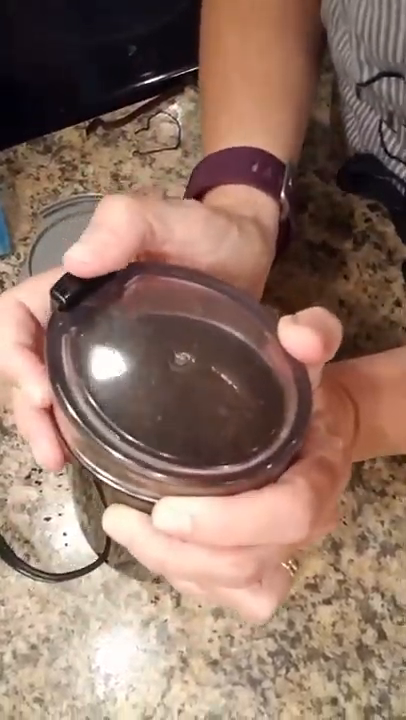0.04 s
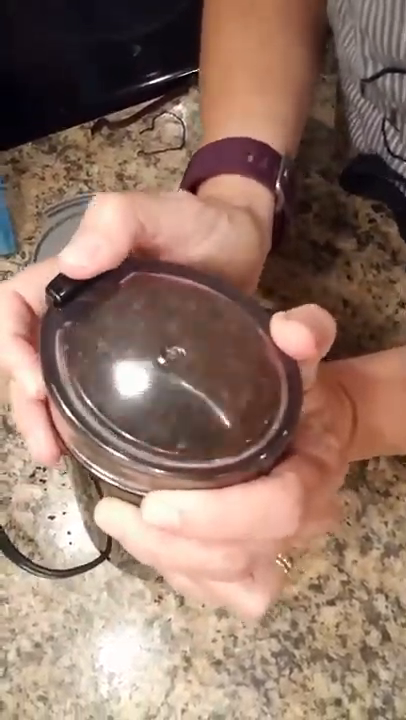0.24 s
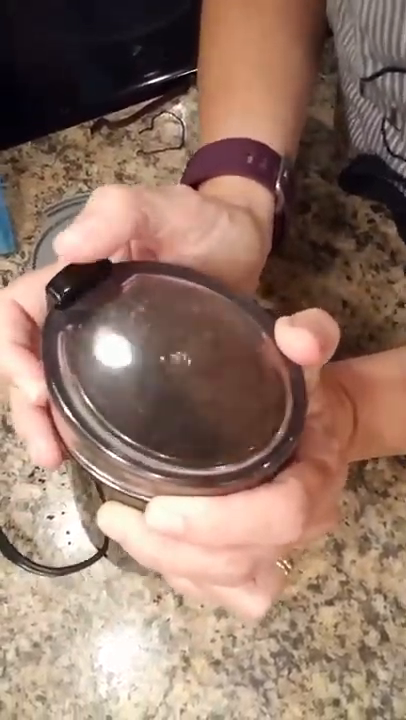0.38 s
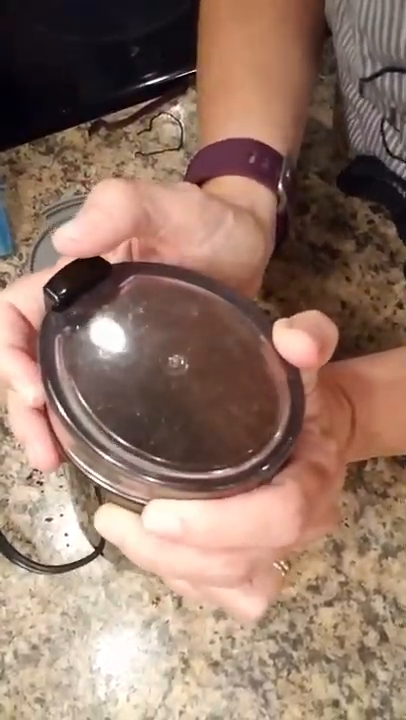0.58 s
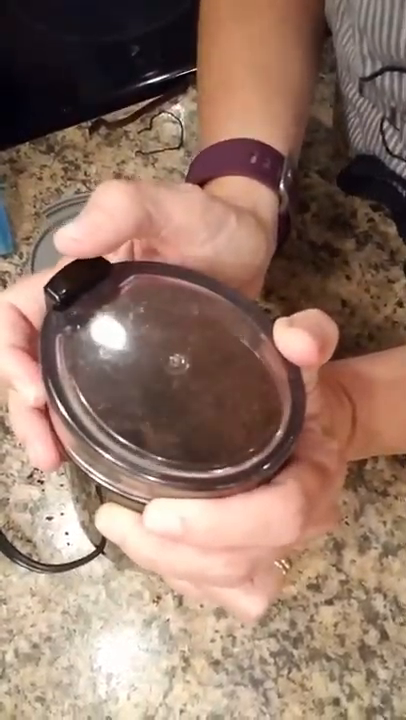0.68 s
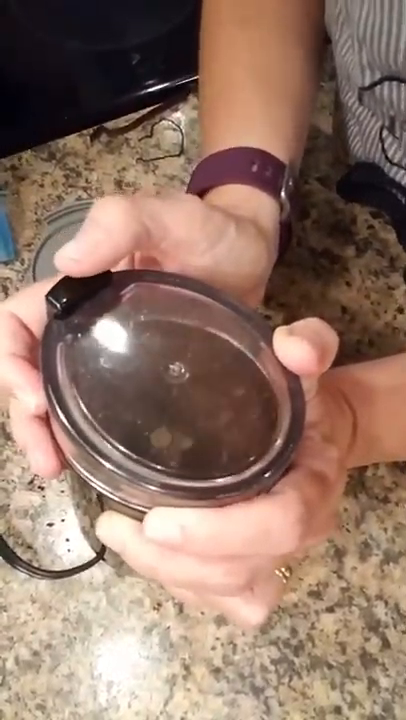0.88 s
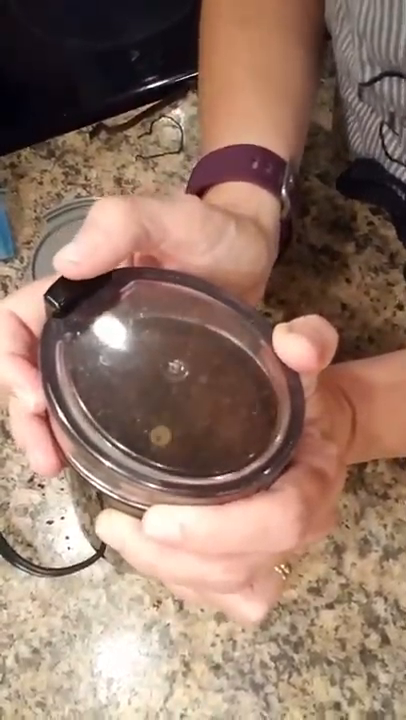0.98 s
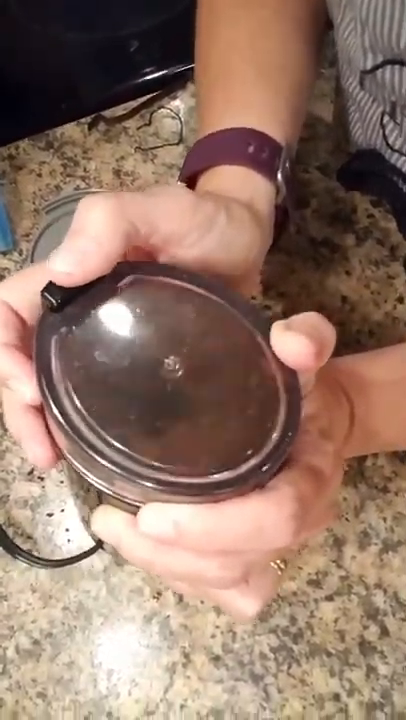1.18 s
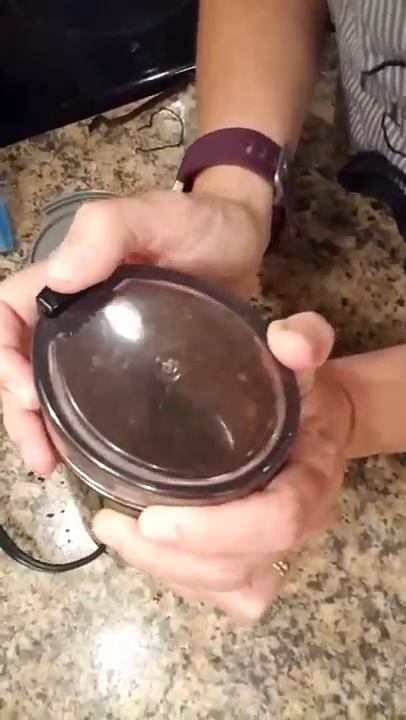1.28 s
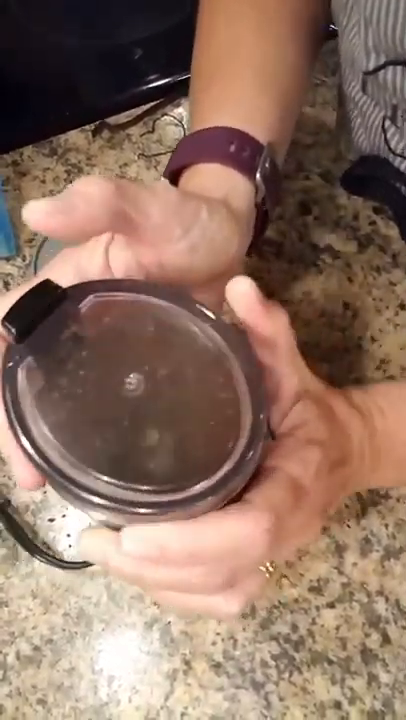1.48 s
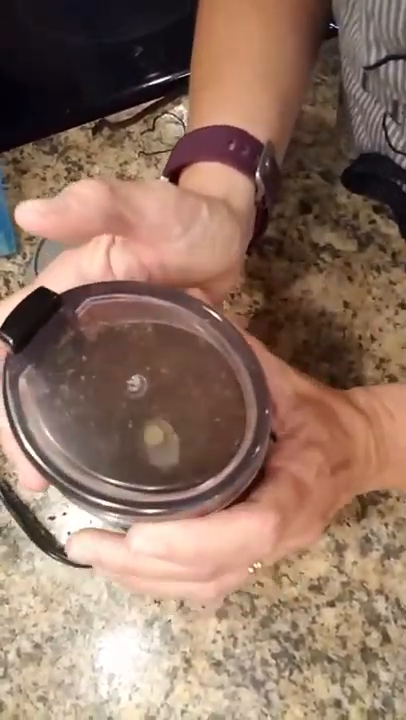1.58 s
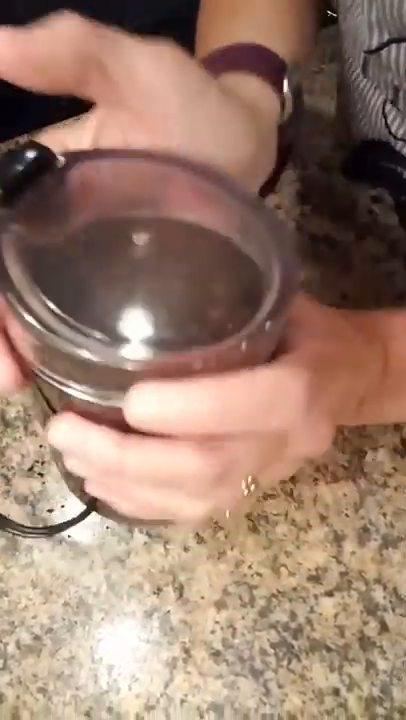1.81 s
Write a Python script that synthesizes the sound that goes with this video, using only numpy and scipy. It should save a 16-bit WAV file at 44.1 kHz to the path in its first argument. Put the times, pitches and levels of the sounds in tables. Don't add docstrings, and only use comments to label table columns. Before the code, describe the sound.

A small electric blade grinder pulses twice, beans rattling and hissing in its cup, then button clicks.

```python
import sys
import numpy as np
from scipy import signal
from scipy.fft import rfft, irfft, next_fast_len
from scipy.io import wavfile
from scipy.ndimage import uniform_filter1d

SR = 44100
rng = np.random.default_rng(int(sys.argv[2]) if len(sys.argv) > 2 else 0)


def invert_db(level):
    return 10 ** (np.asarray(level, dtype=float) / 20)


def transcribe(u):
    v = np.clip(np.atleast_2d(u).T, -1, 1)
    q = np.round(v * 32767).astype(np.int16)
    wavfile.write(sys.argv[1], SR, q)


N = 81585

# start_s [s], level_db [dB]
WHIRL = [
    [(.2425, -75.5), (.245, -21.5), (.29, -20), (.334, -29.5), (.384, -21.5), (.764, -25.5), (.88, -30.5),
     (.98, -55.5), (1.11, -86.5)],
    [(1.265, -85.5), (1.268, -34), (1.3, -20), (1.366, -33.5), (1.373, -25.5), (1.542, -26), (1.655, -41.5),
     (1.72, -62), (1.83, -87.5)],
]
# start_s [s], grit_db [dB], cup_knock_db [dB], low_knock_db [dB]
CLUMPS = [(0.2465, -13, -17.5, -11.5), (0.261, -7, -21.5, -31), (0.2896, -3.5, -27, -22.5),
          (0.3414, -14, -24.5, -52.5), (0.36, -8, -20, -52.5), (0.385, -4, -19.5, -30),
          (0.4114, -5, -34, -46.5), (0.4504, -1, -24, -54), (0.51, -12.5, -24, -31), (0.5671, -7, -21, -40),
          (0.6378, 0, -37.5, -25.5), (0.804, -16.5, -25.5, -24.5), (0.8331, -14, -27.5, -22.5),
          (0.8793, -32, -27, -26), (1.2777, -11, -19.5, -20.5), (1.2956, -14.5, -22.5, -40),
          (1.3424, -3, -57, -34), (1.4057, -6, -41, -46), (1.4324, -3, -22.5, -26.5),
          (1.5054, -6, -33, -34), (1.5554, -5, -28, -29)]
# start_s [s], grit_db [dB], cup_knock_db [dB]
SNAPS = [(0.3913, -8, -14), (0.4155, -4.5, -31), (0.4878, -22, -47), (0.628, -7.5, -8), (0.6972, -3, -13.5),
         (.7035, -10.5, -43), (0.7254, -8.5, -34), (0.7442, -11, -28.5), (0.7645, -12.5, -30),
         (0.8542, -12.5, -35), (1.3728, -7.5, -34), (.2615, -17, -23), (.3395, -13.5, -30.5),
         (.3455, -8.5, -22), (.5675, -12, -28), (.7815, -11.5, -28), (1.3345, -19, -37),
         (1.4062, -14.5, -33), (1.42, -9, -39), (1.4915, -10.5, -36.5), (1.501, -18.5, -38),
         (1.528, -18.5, -37)]
# start_s [s], speed_hz [turns per s], level_db [dB]
ROTOR = [
    [(.25, 325, -33), (.304, 250, -49.5), (.35, 286, -39), (.398, 311, -38.5), (.48, 255, -45),
     (.612, 188, -40), (.702, 130, -40.5), (.73, 240, -60)],
    [(1.33, 180, -48), (1.36, 166, -41.5), (1.42, 144.6, -38.5), (1.45, 100, -54), (1.51, 94.8, -39),
     (1.57, 103, -36.5), (1.625, 124, -43), (1.66, 67, -58.5)],
]


def rms_one(x):
    return x / np.sqrt(np.mean(x ** 2) + 1e-20)


def in_time(rows, off=-120):
    s, *columns = np.transpose(rows)
    return [np.interp(np.arange(N) / SR, s, c, off, off) for c in columns]


def at_hz(points, hz):
    point_hz, value = np.transpose(points)
    return np.interp(np.log(hz), np.log(point_hz), value)


def drift(rate):
    r = np.exp(-2 * np.pi * rate / SR)
    wander = signal.lfilter([1], [1, -2 * r, r * r], rng.standard_normal(N + SR))
    return rms_one(wander[SR:])


def resonate(x, table):
    out = 0
    for k, (hz, width_hz, db) in enumerate(table):
        r = np.exp(-np.pi * width_hz / SR)
        poles = [1, -2 * r * np.cos(2 * np.pi * hz / SR), r * r]
        ring = signal.lfilter([1, 0, -1], poles, x + 1e-18) * (1 - r * r) / 2
        out = out + (-1) ** k * invert_db(db) * ring
    return out


def colour(x, spectrum):
    hz = np.maximum(np.fft.rfftfreq(x.shape[-1], 1 / SR), 1)
    return irfft(rfft(x) * invert_db(at_hz(spectrum, hz)), x.shape[-1])


def glide(rows, wobble_db, wobble_hz):
    hz, db = in_time(rows)
    gain = uniform_filter1d(invert_db(db + wobble_db * drift(22)), size=400)
    pitch_hz = np.maximum(hz, 60) + wobble_hz * drift(30)
    return np.sqrt(2) * gain * np.sin(2 * np.pi * np.cumsum(pitch_hz) / SR)


def background():
    # pitch_hz [Hz], level_db [dB per Hz]
    hush_spectrum = [(15, -25.5), (25, -1.5), (427, -18.5), (1260, -30.5), (1480, -30.5), (1650, -40.5),
                     (1790, -28), (3430, -42), (16000, -51)]
    t = np.arange(N) / SR
    hush = invert_db(-60) * rms_one(colour(rng.standard_normal((2, N)), hush_spectrum))
    hush[0] += invert_db(-59) * np.sin(2 * np.pi * 59 * t)
    gain_before_db, gain_drop_s = 5.5, .25
    return hush * invert_db(gain_before_db * (t < gain_drop_s))


def housing():
    # start_s [s], level_db [dB]
    shake_rows = [
        [(0, -59), (.24, -49.5), (.26, -28), (.43, -48.5), (.65, -42.5), (.9, -45.5), (1.06, -69)],
        [(1.265, -46), (1.28, -32), (1.45, -50), (1.58, -31), (1.66, -44), (1.82, -68.5)],
    ]
    # pitch_hz [Hz], width_hz [Hz], level_db [dB]
    body_modes = [(92, 24, 1.5), (135, 31, -1), (182, 33, -6.5)]
    shake = sum(invert_db(in_time(rows)[0]) for rows in shake_rows)
    rumble = resonate(rng.standard_normal((2, N)), body_modes)
    return shake * rms_one(resonate(rumble, [(131, 290, 0)]))


def knocks():
    # crest_s [s], peak_db
    # [dB], pitch_hz [Hz]
    hit_rows = [(.249, -32, 1300), (.265, -14, 2115), (.271, -23, 1900), (.297, -19, 3450),
                (.342, -19, 2045), (.349, -24, 1950), (.393, -14, 3900), (.4, -16.5, 1870),
                (.452, -12, 3200), (.459, -12, 4000), (.509, -25, 1980), (.552, -25, 2330),
                (.581, -17.5, 3240), (.593, -33, 850), (.594, -24, 2010), (.639, -13.5, 3850),
                (.672, -19, 2270), (.7, -11, 3320), (.757, -21, 3200), (.791, -24, 3720),
                (.796, -22.5, 2160), (.806, -20.5, 2010), (.807, -27.5, 656), (.834, -36, 780),
                (.884, -23, 2040), (.899, -25.5, 3700), (1.279, -21.5, 3400), (1.28, -29.5, 1184),
                (1.281, -27, 2000), (1.298, -16, 3570), (1.302, -12.5, 1964), (1.343, -37, 3380),
                (1.399, -32, 2060), (1.406, -29, 3300), (1.432, -28, 2270), (1.434, -29, 842),
                (1.441, -19.5, 1980), (1.492, -25, 1970), (1.508, -34, 2100), (1.528, -27, 3800),
                (1.531, -24.5, 876), (1.556, -14, 4090), (1.559, -18.5, 1875), (1.583, -26.5, 2060),
                (0.256, -23.5, 1510), (1.284, -31, 395), (0.055, -50.5, 1790), (.1118, -39.5, 4000),
                (.192, -56, 1800)]
    swell_cycles, trim_db = 4.49, -3
    out = np.zeros((2, N))
    turns = rng.uniform(0, 2 * np.pi, (len(hit_rows), 2))
    for (s, db, hz), turn in zip(hit_rows, turns):
        t = np.maximum((np.arange(N) / SR - s) * hz / swell_cycles + 1, 0)
        ring = np.sin(2 * np.pi * swell_cycles * t + turn[:, None])
        out += invert_db(db + trim_db) * t * np.exp(1 - t) * ring
    return out


def button():
    # start_s [s], peak_db [dB], pitch_hz [Hz], brightness_db [dB]
    tick_rows = [
        (0.13, -43.5, 3950, 4),
        (1.248, -74, 1800, 3),
        (1.8435, -45.5, 1900, -11),
        (0.23, -68, 6000, 5.5),
        (1.836, -44.5, 2050, -6.5),
    ]
    rattle_s = .004
    out, noise = 0, rng.standard_normal((2, N))
    for s, db, hz, bright_db in tick_rows:
        t = np.arange(N) / SR - s
        burst = noise * invert_db(db) * np.exp(-np.maximum(t, 0) / rattle_s) * (t >= 0)
        out = out + 5 * resonate(burst, [(hz, 500, 0)])
        out = out + 5 * resonate(burst, [(hz / 1.9, 400, bright_db - 3)])
        out = out + invert_db(bright_db - 7) * burst
    return out


def grains(rate, spread_db, lumpy_db):
    size = invert_db(spread_db * np.minimum(rng.exponential(1, N), 4) + lumpy_db * drift(86))
    strikes = rng.random(N) < rate / SR
    return rms_one(size * strikes * rng.standard_normal((2, N)))


def bursts(rows, column, trim_db, rise_s, fall_s):
    rows = np.array(rows)
    t = np.arange(N) / SR - rows[:, :1]
    shape = np.exp(np.where(t < 0, t / rise_s, -t / fall_s))
    level = invert_db(rows[:, column:column + 1] + trim_db)
    return ((level * shape) ** 2).sum(axis=0)


def clumps(column, trim_db, fall_s):
    return bursts(CLUMPS, column, trim_db, .0021, fall_s)


def snaps(column, trim_db):
    return bursts(SNAPS, column, trim_db, .0003, .0028)


def steady(follows, level_db):
    whirl = sum(invert_db(in_time(rows)[0] + 26) for rows in WHIRL)
    return (whirl ** follows * invert_db(level_db - 24)) ** 2


def strike(hits, power, body):
    return body(hits * np.sqrt(power)) / np.sqrt(np.mean(body(hits) ** 2))


def grit():
    # pitch_hz [Hz], level_db [dB per Hz]
    hiss_spectrum = [(200, -34.5), (1500, -25.5), (1940, -13), (4000, -9.5), (7270, -9), (11300, -2),
                     (16000, -3.5)]
    power = steady(1.05, 3) + clumps(1, -11, .0048) + snaps(1, .5)
    return strike(grains(16000, .94, .98), power, lambda x: colour(x, hiss_spectrum))


def cup(x):
    # pitch_hz [Hz], width_hz [Hz], level_db [dB]
    wall_modes = [(1844, 140, 3), (2100, 283, -0.5), (2428, 154, 2.5), (2923, 71, 1), (3212, 243, -0.5),
                  (3976, 710, -1), (5040, 510, -3), (5800, 1100, -8.5)]
    speed = uniform_filter1d(np.maximum(in_time(ROTOR[0])[0], 0), size=2000)
    bright_db_per_octave = 1.5
    tilt = invert_db(bright_db_per_octave * np.log2(np.maximum(speed, 150) / 200) / 2)
    return resonate(x / tilt, wall_modes[:3]) - resonate(x * tilt, wall_modes[3:])


def chips():
    power = steady(.86, -6) + clumps(2, -.5, .02) + snaps(2, -4.5)
    return strike(grains(5000, 1.5, 1.8), power, cup)


def beans():
    # pitch_hz [Hz], width_hz [Hz], level_db [dB]
    hollow_modes = [(318, 88, -10), (452, 89, -10), (601.5, 93, -1.5), (690, 101, -2.5), (845, 87, -5.5),
                    (950, 80, -5), (1300, 283, -8)]
    power = steady(.74, -15) + clumps(3, -6, .011)
    return strike(grains(1500, .43, 1.3), power, lambda x: resonate(x, hollow_modes))


def motor_kicks():
    # crest_s [s], peak_db [dB], pitch_hz [Hz], swell_s [s]
    kick_rows = [
        (0.255, -17, 122, 0.0075),
        (0.2828, -27.5, 126.4, 0.0059),
        (0.318, -26.5, 118.7, 0.0095),
        (0.36, -36, 116.7, 0.021),
        (1.2791, -18.5, 135, 0.0039),
        (1.317, -28, 111, 0.024),
    ]
    out = np.zeros(N)
    for s, db, hz, swell in kick_rows:
        t = np.arange(N) / SR - s
        width = swell * np.where(t > 0, 1.3, 1)
        out += invert_db(db) * np.exp(-.5 * (t / width) ** 2) * np.cos(2 * np.pi * hz * t)
    return out


def blade_bites():
    # start_s [s], level_db [dB], decay_s [s]
    bite_rows = [
        (0.25, -32.5, 0.028),
        (1.268, -36, 0.035),
    ]
    # pitch_hz [Hz], width_hz [Hz], level_db [dB]
    bite_modes = [(310, 160, -1), (463, 310, -2), (1430, 780, 0.5), (2400, 800, -1.5)]
    out, noise = np.zeros((2, N)), rng.standard_normal((2, N))
    for s, db, decay in bite_rows:
        t = np.maximum(np.arange(N) / SR - s, 0) / decay
        swell = 3 * t * np.exp(-3 * t) * np.e
        out += resonate(noise * invert_db(db + 20) * swell, bite_modes)
    return out


def rotor():
    return sum(glide(rows, 1.4, 6.8) for rows in ROTOR)


def singing_air():
    # start_s [s], pitch_hz [Hz], level_db [dB]
    air_rows = [
        [(.47, 841, -65), (.55, 825, -43.5), (.6, 930, -45.5), (.67, 870, -48.5), (.765, 865, -43),
         (.815, 830, -41.5), (.9, 823, -56)],
        [(1.31, 950, -58), (1.35, 957, -40), (1.39, 898.6, -69), (1.44, 852.3, -34), (1.48, 848.3, -60),
         (1.535, 873.3, -41), (1.58, 790, -45), (1.67, 862, -61)],
        [(1.32, 604, -56), (1.43, 660, -63), (1.53, 705, -40), (1.68, 690, -57)],
    ]
    return sum(glide(rows, 4, 22) for rows in air_rows)


def kitchen(x):
    t60_s, wall_cut_hz, room_low_hz = .37, 970, 350
    size = next_fast_len(N + SR)
    w = 2 * np.pi * np.fft.rfftfreq(size)
    dull = 1 / (1 + 1j * w * SR / (2 * np.pi * wall_cut_hz)) ** .5
    out = np.zeros((2, len(w)), complex)
    for k, lag in enumerate(rng.uniform(.008, .025, 20) * SR):
        loop = invert_db(-60 * lag / SR / t60_s) * dull * np.exp(-1j * w * lag)
        out[k % 2] += (-1) ** (k // 2) * loop / (1 - loop)
    bass_cut = w / (w - 2j * np.pi * room_low_hz / SR)
    return irfft(out * rfft(x, size) * bass_cut, size)[:, :N] / 3


def spread(pair):
    # pitch_hz [Hz], likeness [0 to 1]
    likeness = [(60, 1), (250, 0.92), (600, .9), (1100, 0.27), (2000, 0.21), (5000, 0.064), (15000, 0.11)]
    # pitch_hz [Hz], lean_db [dB]
    lean_rows = [(60, -3), (150, -4.5), (380, -3), (950, -2.5), (2380, 2), (5980, 0), (15000, -5.5)]
    right_lag_s, port_turn_rad = .00001, -1.34
    hz = np.maximum(np.fft.rfftfreq(N, 1 / SR), 1)
    alike = np.clip(at_hz(likeness, hz), 0, 1)
    lean = invert_db(at_hz(lean_rows, hz) / 2)
    mid, side = rfft(pair) * np.sqrt([(1 + alike) / 2, (1 - alike) / 2])
    port = port_turn_rad * np.exp(-np.log(hz / 1150) ** 2 / .097)
    delay = np.exp(-2j * np.pi * hz * right_lag_s - 1j * port)
    return irfft([(mid + side) * lean, (mid - side) / lean * delay], N)


def scene():
    near = housing() + knocks() + button() + grit() + chips() + beans() + blade_bites()
    near[0] += motor_kicks() + rotor() + singing_air()
    return spread(near + background()) + invert_db(-10) * kitchen(near[0])


def roll_off(x):
    return signal.sosfilt(signal.butter(12, 16800, fs=SR, output="sos"), x)


def record(dry):
    peak, cutoff_hz = .66, 15790
    x = signal.sosfilt(signal.butter(2, 55, "high", fs=SR, output="sos"), dry)
    x = peak * np.tanh(x / peak)
    x = signal.sosfilt(signal.ellip(16, .3, 85, cutoff_hz, fs=SR, output="sos"), x)
    return roll_off(x)


dry = scene()
out = record(dry)
transcribe(out)
```